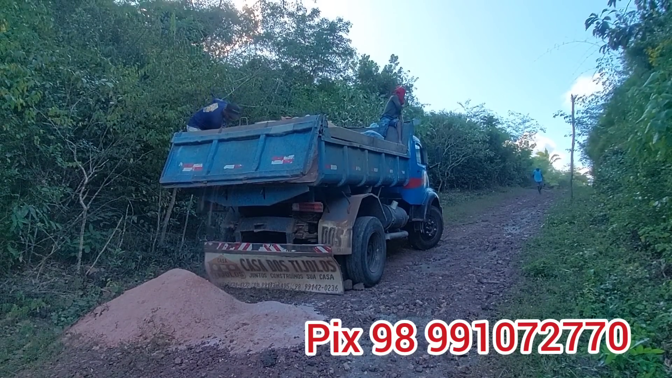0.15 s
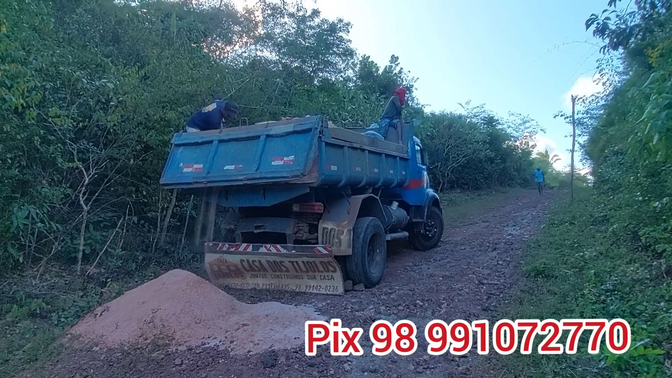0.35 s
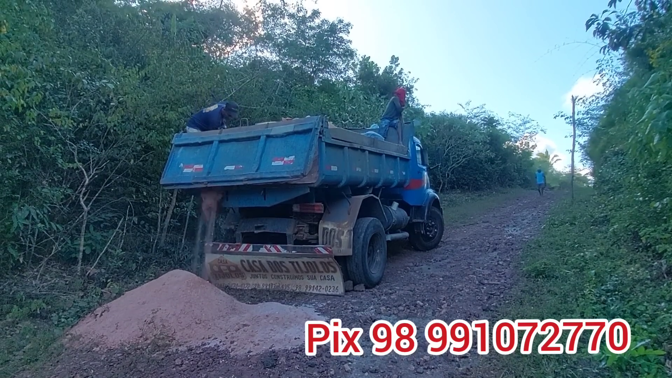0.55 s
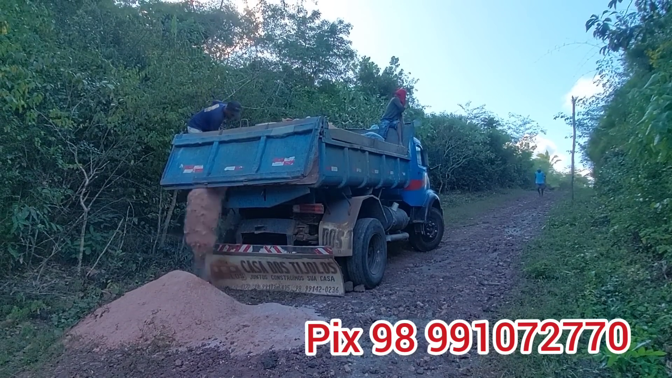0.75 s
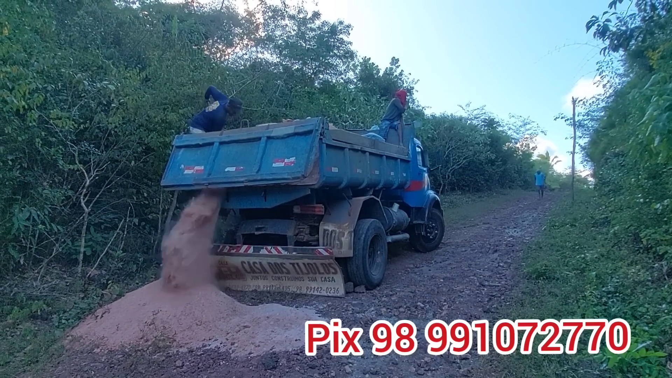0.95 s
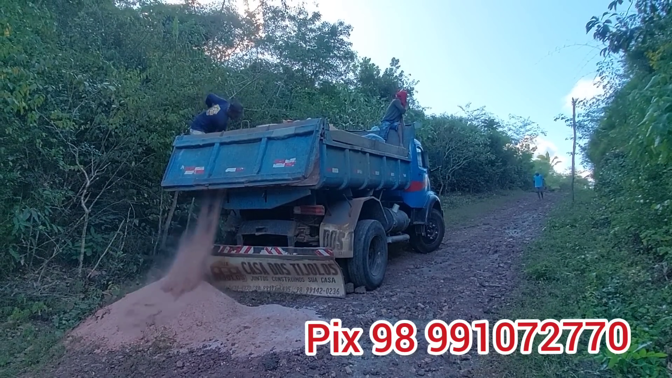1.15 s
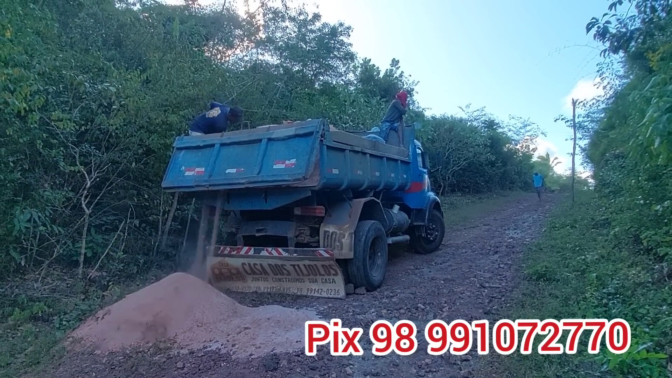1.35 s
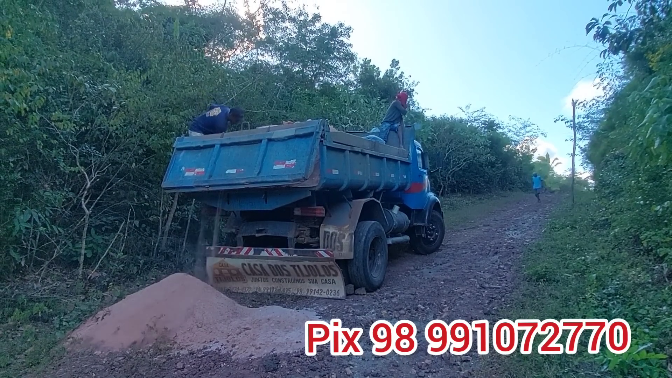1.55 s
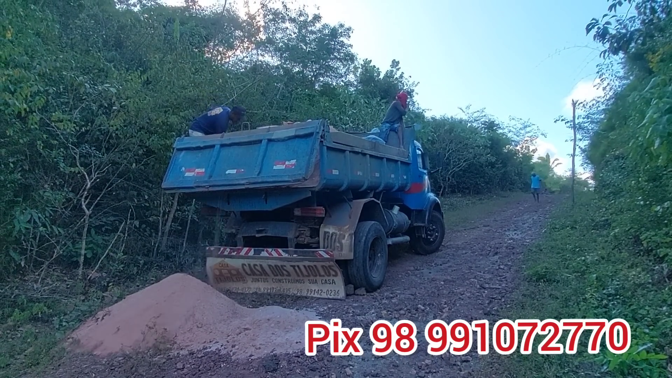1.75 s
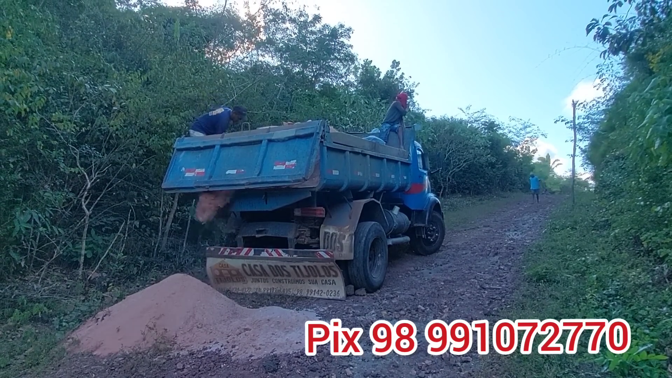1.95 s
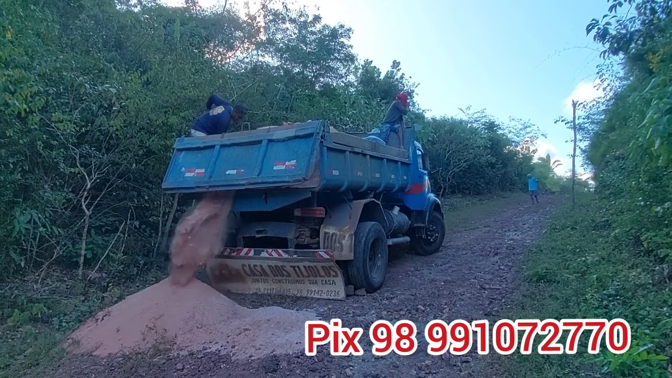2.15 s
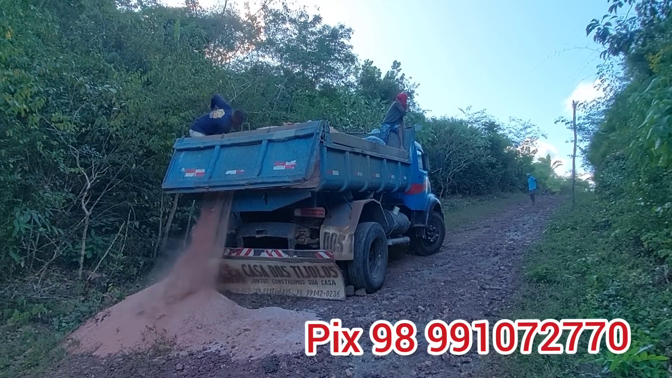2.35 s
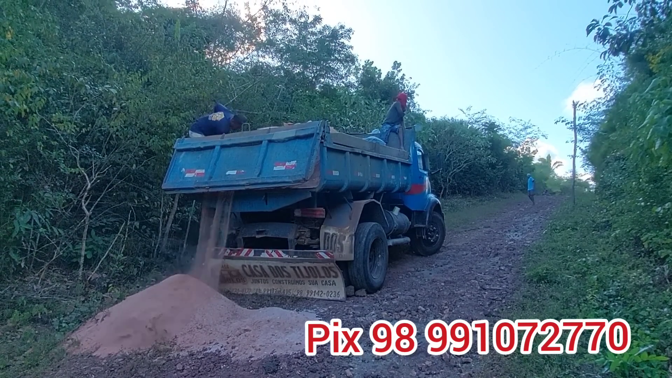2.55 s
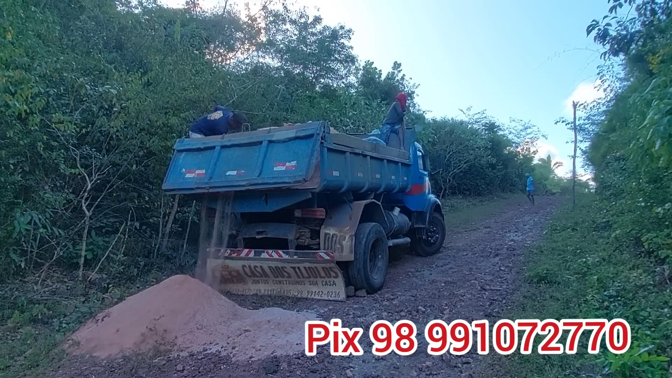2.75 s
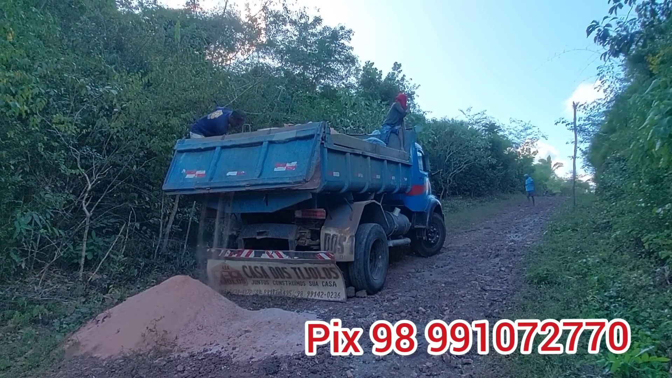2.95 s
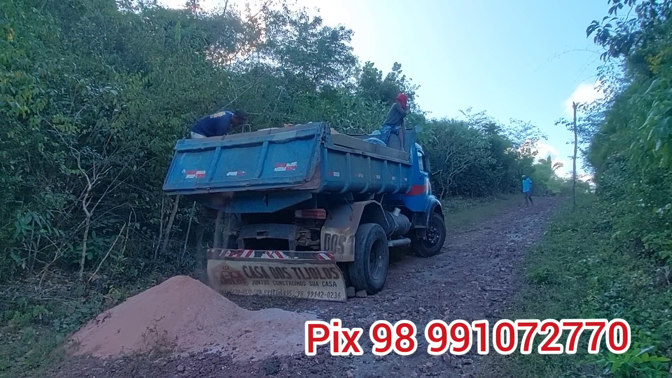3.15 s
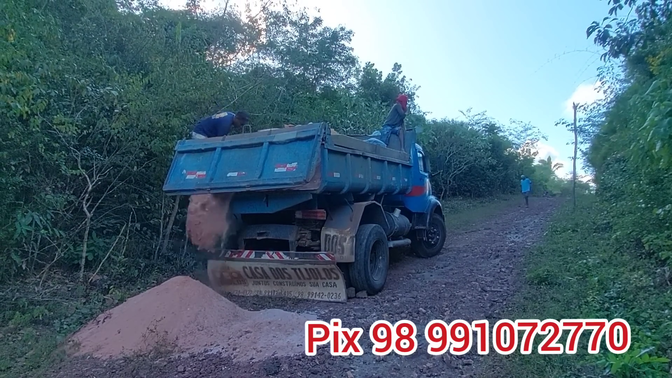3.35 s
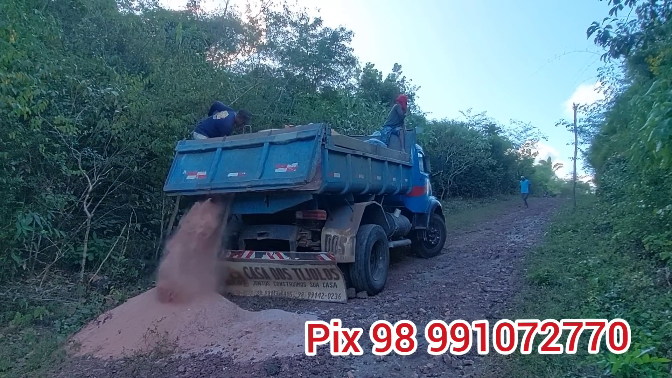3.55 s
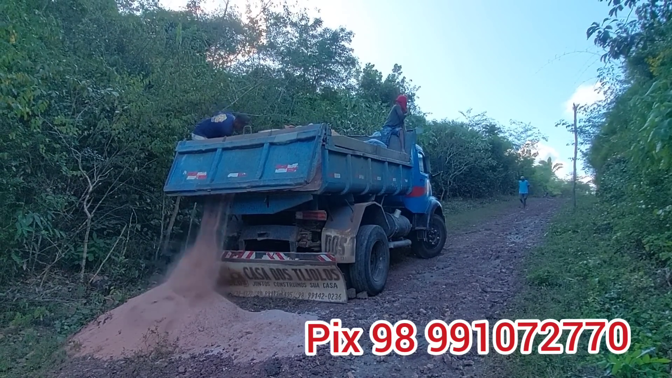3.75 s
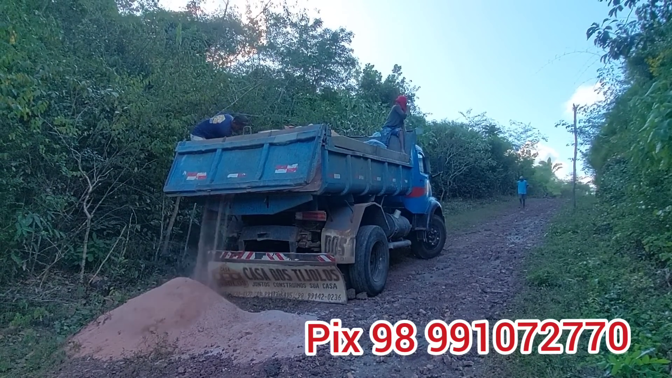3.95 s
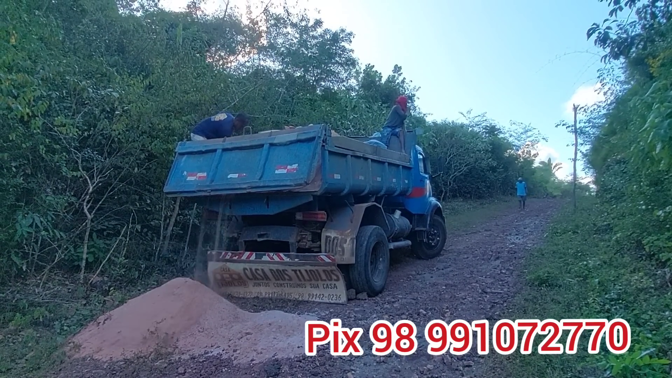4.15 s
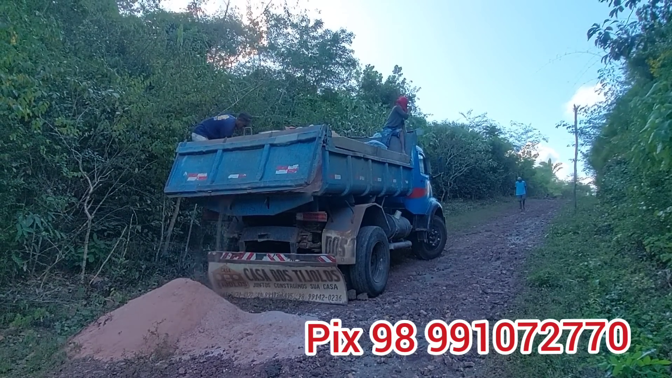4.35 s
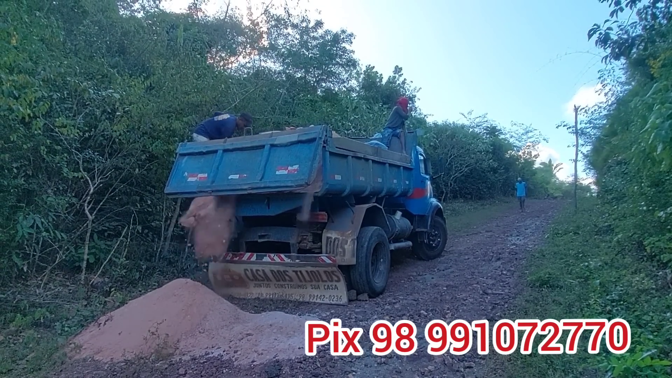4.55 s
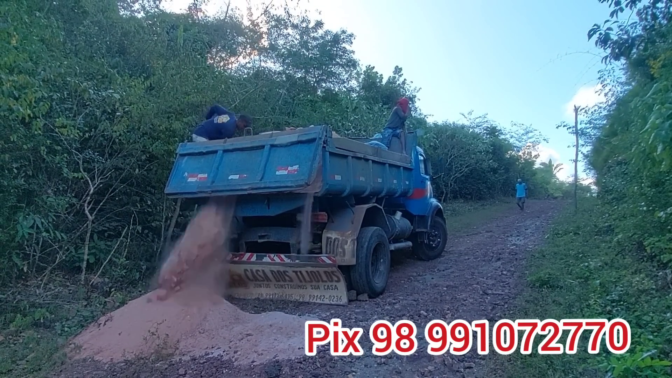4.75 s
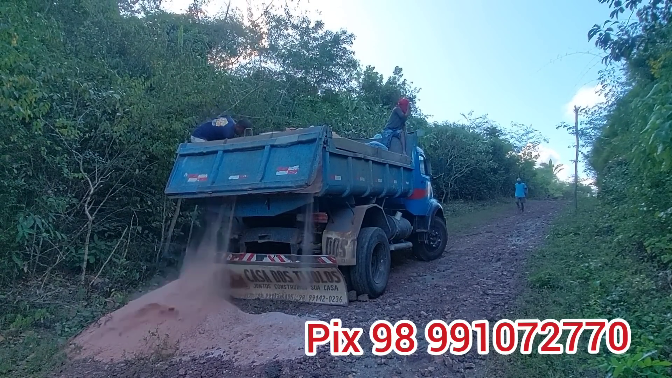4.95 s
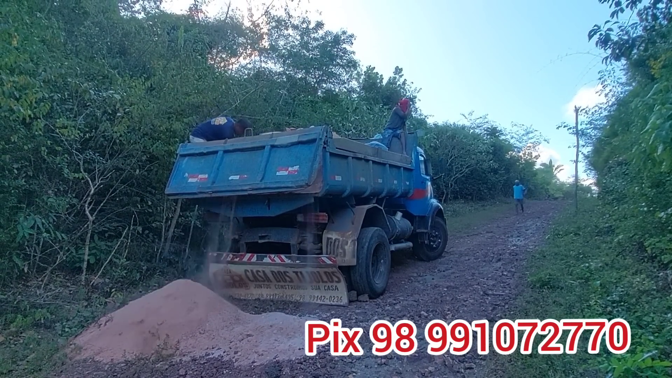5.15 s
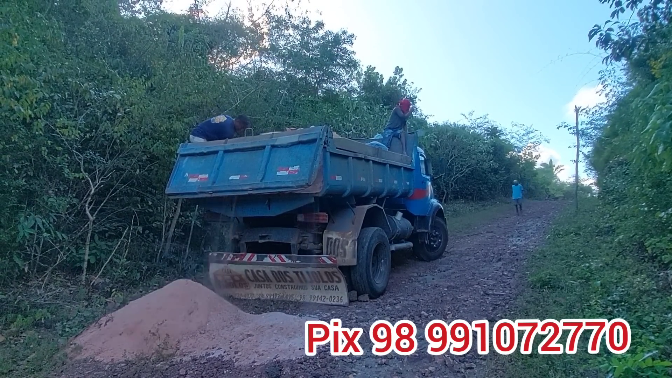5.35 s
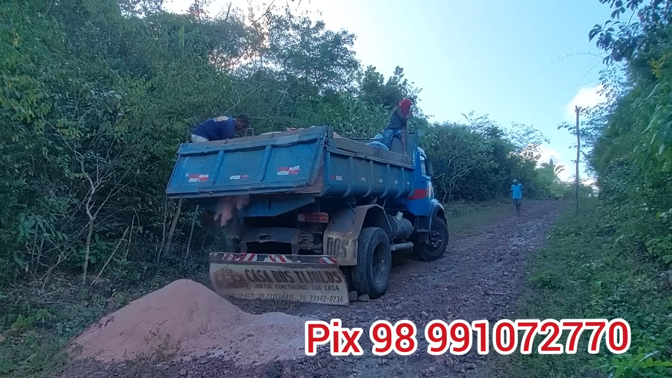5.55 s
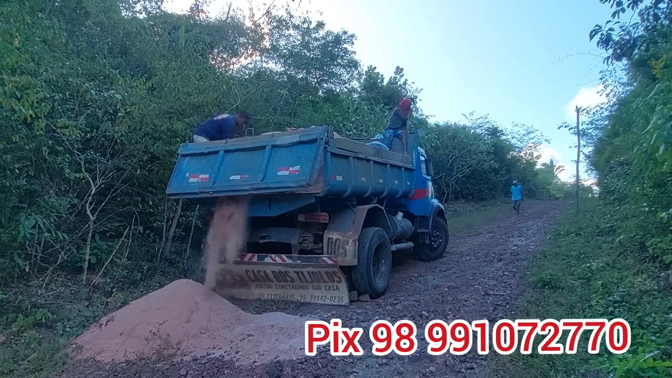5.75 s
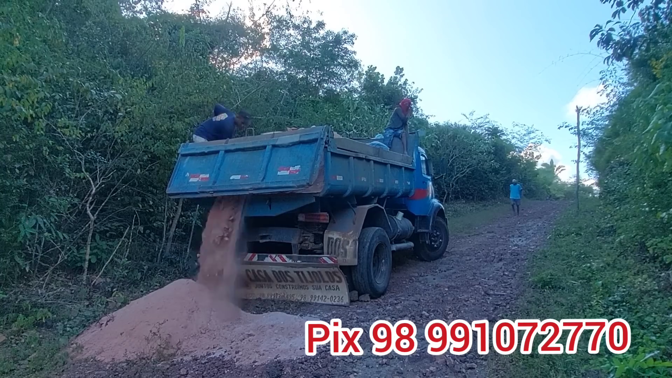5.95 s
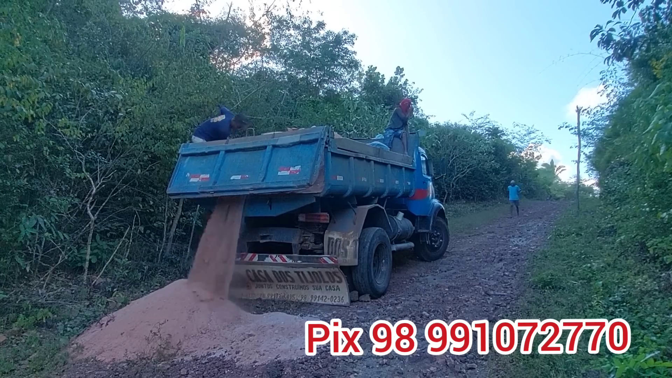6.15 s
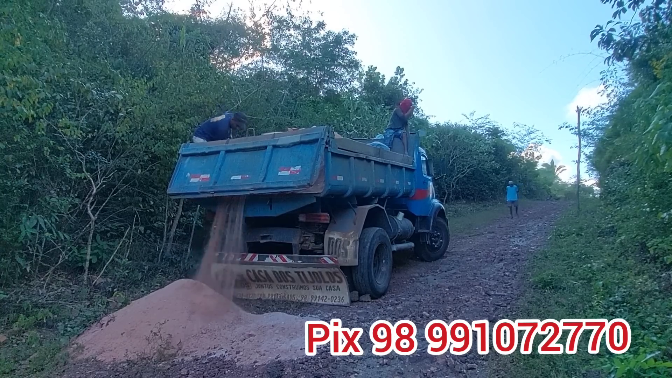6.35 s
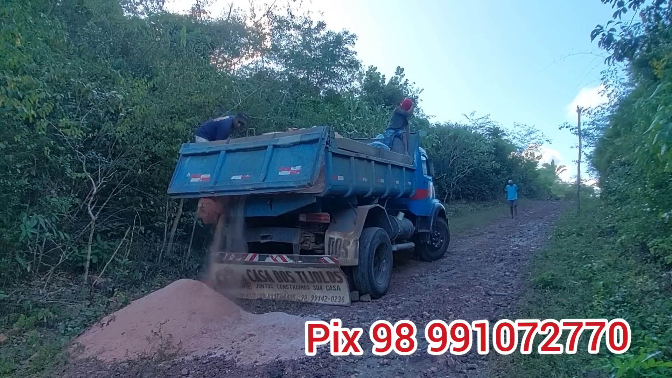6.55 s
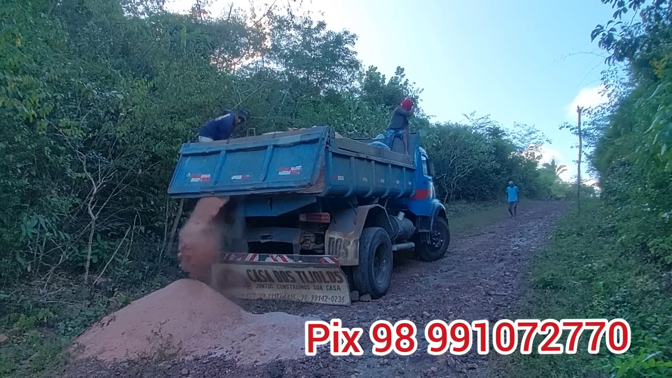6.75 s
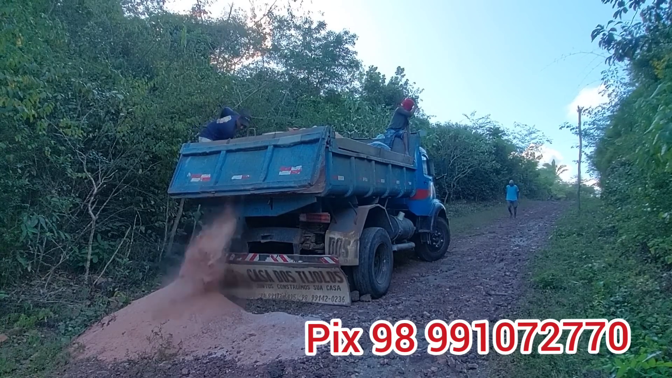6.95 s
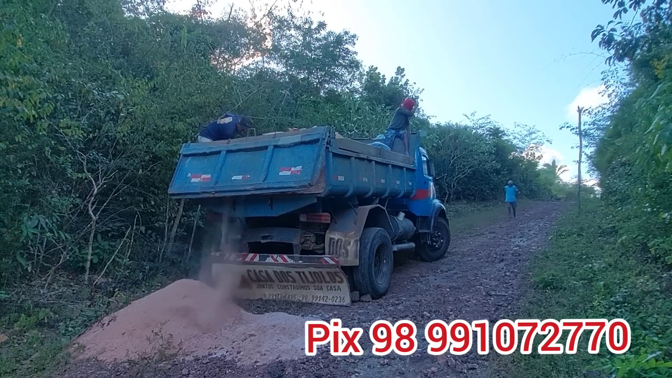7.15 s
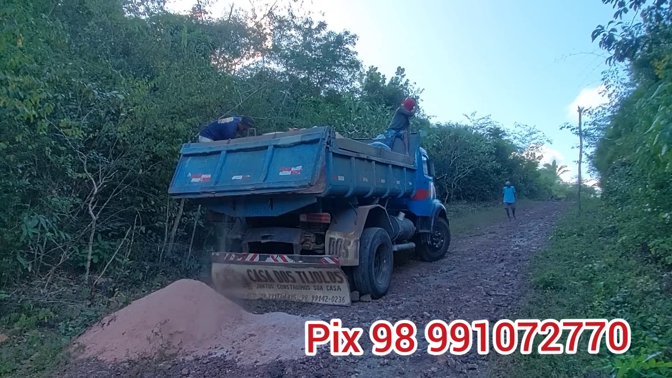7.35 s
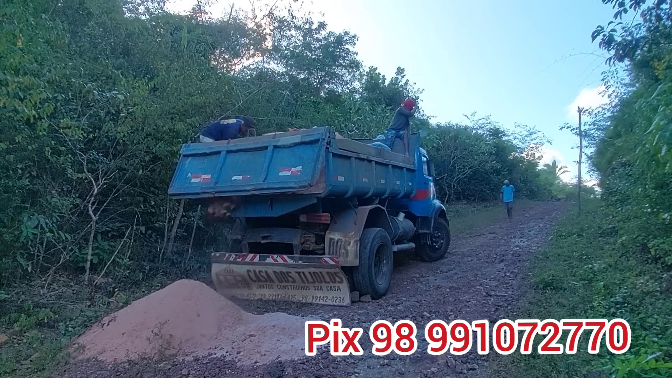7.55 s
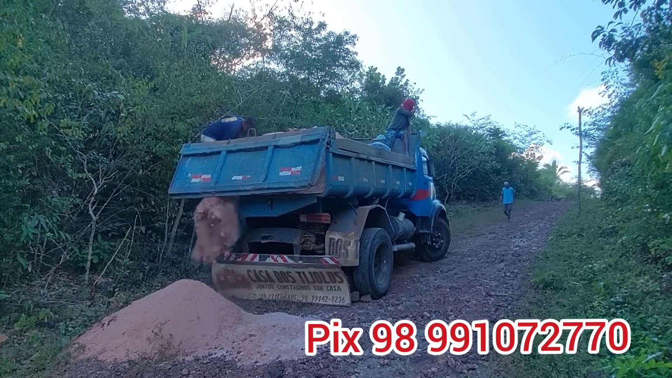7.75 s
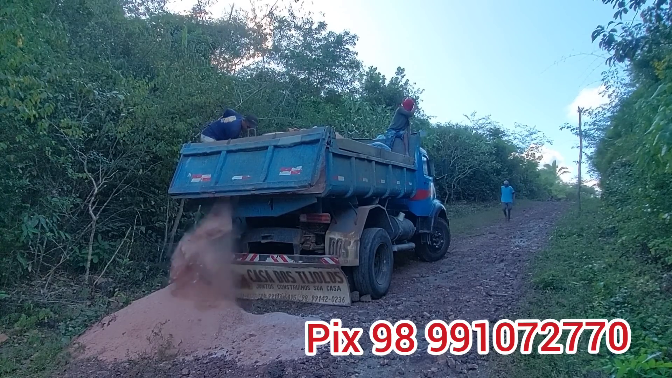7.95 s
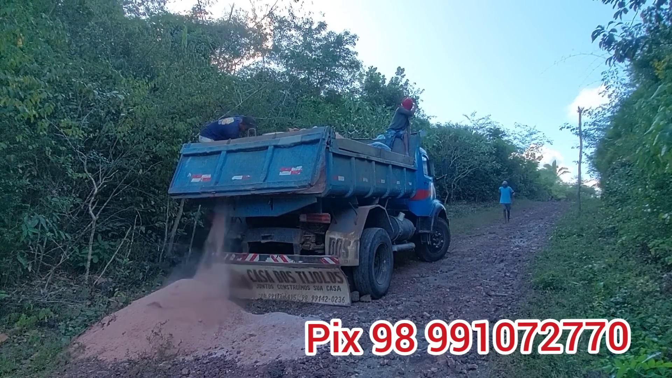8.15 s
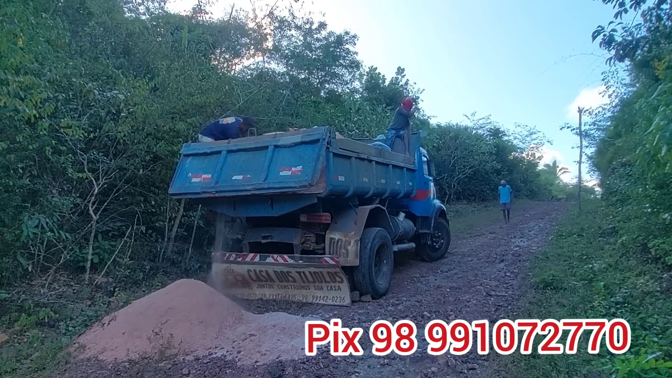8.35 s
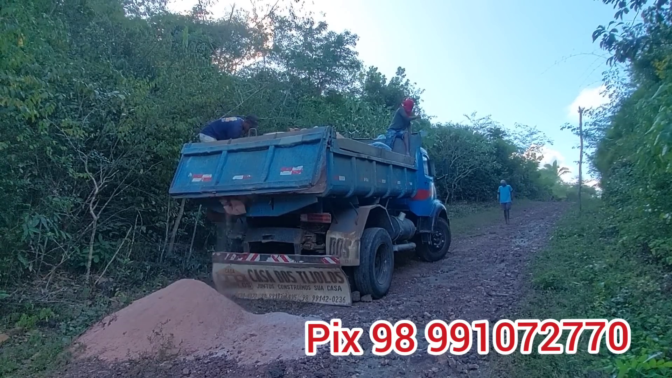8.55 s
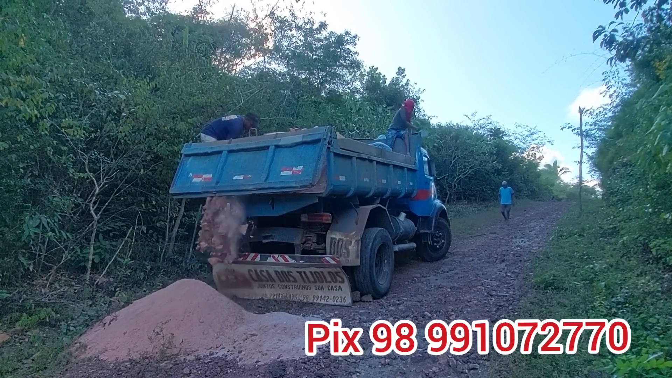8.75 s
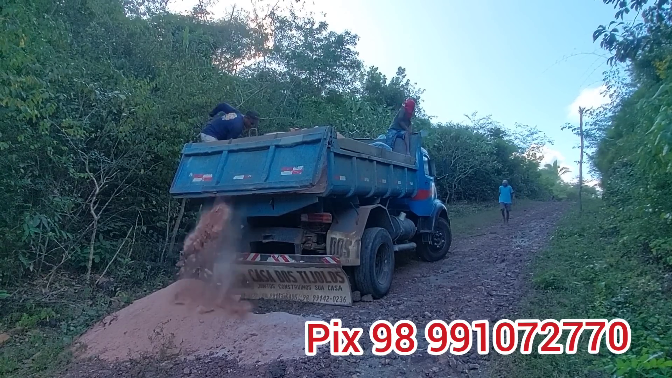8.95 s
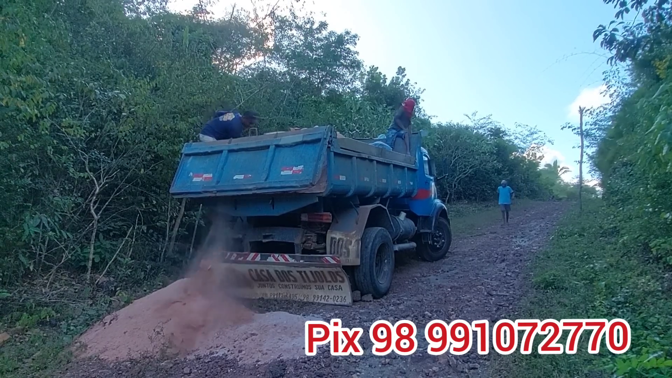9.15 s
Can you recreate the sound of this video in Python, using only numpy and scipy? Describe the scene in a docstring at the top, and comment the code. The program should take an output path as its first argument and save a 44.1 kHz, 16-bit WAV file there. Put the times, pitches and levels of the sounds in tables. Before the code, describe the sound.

Outdoors, a shovel scrapes damp sand off a hollow steel truck bed, load after load slumping, knocking and thudding softly onto a sand heap.

```python
"""Shovelling sand from a steel truck bed

Damp sand is shovelled off the steel bed of a tipper truck outdoors. The blade scrapes, jams and knocks:
grain impacts and damped modes ring in the steel. Loads slump as crowds of soft impacts, then thud onto
the heap as lumps, grit and damped low pushes. Loose grains hiss and tick, over low rumble and thin air."""
import sys
import numpy as np
from scipy import signal
from scipy.fft import rfft, irfft, next_fast_len
from scipy.io import wavfile
from scipy.ndimage import map_coordinates

SR = 44100
rng = np.random.default_rng(int(sys.argv[2]) if len(sys.argv) > 2 else 0)


def dump_mix(stems):
    """Bounce the given channels to the path in sys.argv[1] as a 16-bit WAV at rate SR."""
    frames = np.atleast_2d(stems).T  # one column per channel
    limited = np.clip(frames, -1, 1)  # hard clip at full scale
    pcm = np.round(limited * 32767).astype(np.int16)
    wavfile.write(sys.argv[1], SR, pcm)


N = 406602

# Event levels are relative; most layers are trimmed again where mixed,
# but knocks, drags and stray ticks have no trim of their own.
# Blade strokes through sand on steel: [t/s, length/s, level/dB, change over stroke/dB,
# spilled sand level/dB, floor drone against level/dB]
STROKES = [(0.84, 0.036, -47, -4, -94, -9), (3.377, 0.11, -40.5, -3.5, -53.5, -22),
           (4.551, 0.12, -43.5, -5.5, -55.5, -12), (6.685, 0.12, -52.5, 1, -57, -6),
           (7.78, 0.11, -57, 0, -55.5, -12), (8.744, 0.13, -58, 13, -55, -7.5)]
# Load dragging over the floor: [t/s, length/s, level/dB, change over drag/dB, spilled sand level/dB]
DRAGS = [(0.185, 0.1, -68, 5, -65), (0.687, 0.16, -64, 0, -56), (2.702, 0.34, -69, 7, -77),
         (5.857, 0.088, -66.5, -3, -64.5)]
# Gritty shoves of the blade along the bed: [t/s, level/dB, t60/s, floor drone against level/dB]
SHOVES = [(4.935, -41.5, 0.5, -12), (4.983, -33.5, 0.41, -22), (5.121, -45.5, 0.16, -22),
          (6.329, -34.5, 0.16, -12), (7.179, -33.5, 0.25, 0.5), (7.232, -34.5, 0.18, -24),
          (7.319, -35, 0.27, 2), (7.355, -41.5, 0.21, 3), (7.387, -36.5, 0.16, -10),
          (8.193, -31.5, 0.32, -14), (9.181, -38.5, 1, -5)]
# Resonances of the blade on the bed: [f/Hz, width/Hz, level/dB]
BLADE_MODES = [(1388, 91, 14.5), (2164, 36, 13), (2423, 170, 12), (3060, 40, -16), (4730, 160, 9.5),
               (5180, 190, 10), (5590, 220, 9.5)]
# Resonances of the tailgate: [f/Hz, width/Hz, level/dB]
TAILGATE_MODES = [(548, 42, 2.5), (704, 48, 2), (1140, 160, -1.5), (1311, 86, 4.5), (1687, 61, -8),
                  (1927, 110, 1)]
# Resonances of the floor plate under the blade: [f/Hz, width/Hz, level/dB]
FLOOR_MODES = [(552, 55, -2.1), (698, 58, -0.72)]
# Colour of sand rasping on steel: [f/Hz, level/dB]
RASP = [(150, -11), (420, -52), (570, -1), (1300, -3), (2400, 0.5), (5500, 1), (8000, -3), (14000, -15)]

DRAG_RISE_DB_PER_S, DRAG_FALL_DB_PER_S = 219, 187


def amp(db):
    """Decibels to gain."""
    return 10 ** (np.asarray(db) / 20)


def unit(x):
    """Scale to rms 1."""
    return x / np.sqrt(np.mean(x ** 2) + 1e-20)


def along(points, hz):
    """Read (Hz, value) points on a log frequency axis."""
    f, v = np.transpose(points)
    return np.interp(np.log(hz + 1), np.log(f + 1), v)


def noise():
    """Two unrelated white noises."""
    return rng.standard_normal((2, N))


def wobble(rate):
    """A smooth random curve, rate knots a second."""
    knots = rng.standard_normal(int(N * rate / SR) + 4)
    return map_coordinates(knots, [np.arange(N) * rate / SR])


def filtered(x, response):
    """x times a complex response of frequency."""
    m = next_fast_len(N + SR // 2)
    return irfft(rfft(x, m) * response(np.fft.rfftfreq(m, 1 / SR)), m)[..., :N]


def coloured(x, spectrum):
    """x through the given colour, at rms 1."""
    return unit(filtered(x, lambda hz: amp(along(spectrum, hz))))


def rung(x, modes):
    """x through parallel damped resonances of alternating sign, at rms 1."""
    def response(f):
        total = 0
        for k, (centre, width, db) in enumerate(modes):
            damping = 1j * f * width
            total = total + (-1) ** k * amp(db) * damping / (centre * centre - f * f + damping)
        return total
    return unit(filtered(x, response))


def grains(rate, spread_db):
    """Random impacts of scattered size, rate a second: two unrelated streams at rms 1."""
    hits = rng.random((2, N)) < rate / SR
    return unit(hits * rng.choice([-1, 1], (2, N)) * amp(spread_db * noise()))


def blow(s, hold, t60):
    """Gain of a contact that builds in 3.5 ms from s and starts to die away at hold after s."""
    t = np.maximum(np.arange(N) / SR - s, 0)
    return np.minimum(t / .0035, 1) * amp(-60 * np.minimum(np.maximum(t - hold, 0) / t60, 2))


def flow(s, length, change_db, rise, fall):
    """Gain of moving sand: rises until s, changes steadily for length, then falls; slopes in dB/s."""
    t = np.arange(N) / SR - s
    change = change_db * np.clip(t / max(length, 1 / SR), 0, 1)
    return amp(change + rise * np.minimum(t, 0) - fall * np.maximum(t - length, 0))


def thump(s, hz, t60):
    """One damped sine push from s, its pitch randomly scattered by about a quarter."""
    t = np.maximum(np.arange(N) / SR - s, 0)
    pitch_hz = hz * amp(2 * rng.standard_normal())
    return amp(-60 * np.minimum(t / t60, 2)) * np.sin(2 * np.pi * pitch_hz * t)


def air():
    """Faint outdoor background: shaped noise as low rumble, and a thin, steady band of high hiss."""
    # Background colour: [f/Hz, level/dB]
    air_colour = [(25, 1), (85, -3.5), (170, -5), (400, -11.5), (1100, -18.5), (2100, -10), (3100, -27.5),
                  (5000, -13), (15500, -20)]
    thin = coloured(noise(), [(7100, -50), (7600, -5), (7900, 0), (8100, -50)])
    return amp(-66.0) * coloured(noise(), air_colour) + amp(-65) * thin


def shove_force():
    """Drive of the blade along the floor: a short run-up as it gathers sand, then the jolt."""
    force = 0
    for s, db, t60, floor_db in SHOVES:
        run_up = amp(-11.5) * flow(s, 0, 0, rise=450, fall=450)
        force = force + amp(db) * (blow(s, hold=0.013, t60=t60) + run_up)
    return force


def loose_sand():
    """Amount of running sand: throws spray, then dribble; strokes, drags and shoves spill more."""
    # Loose sand after each throw: [t/s, spray level/dB, dribble level/dB, dribble length/s]
    throws = [(0.0, -51, -71, 0.16), (1.217, -48, -54, 0.74), (2.459, -51, -57, 0.24),
              (2.657, -52.5, -54, 0.4), (3.805, -42, -63, 1), (5.01, -67, -51.5, 0.39),
              (6.198, -61, -51.5, 0.068), (7.362, -45, -74, 0.22), (8.236, -45.5, -78, .2)]
    spray_rise, spray_fall = 212, 200  # dB/s
    sag, run_out = 8.5, 93  # dB/s: the dribble thins slowly, then runs out
    running = amp(-95)  # a little sand always sifts off the edge
    for s, spray_db, dribble_db, length in throws:
        running = running + amp(spray_db) * flow(s, 0, 0, spray_rise, spray_fall)
        running = running + amp(dribble_db) * flow(s, length, -sag * length, spray_rise, run_out)
    # sand runs ahead of the blade and settles behind it
    for s, length, db, change_db, spill_db, floor_db in STROKES:
        running = running + amp(spill_db) * flow(s, length, 0, rise=103, fall=196)
    for s, length, db, change_db, spill_db in DRAGS:
        running = running + amp(spill_db) * flow(s, length, 0, DRAG_RISE_DB_PER_S, DRAG_FALL_DB_PER_S)
    return running + amp(-6.5) * shove_force()


def trickle():
    """Fine sand hisses down as dense impacts in uneven wisps, with small stones ticking in it."""
    # Colour of falling grains: [f/Hz, level/dB]
    spray_colour = [(150, -21), (350, -1), (1100, -6.5), (2200, 5.5), (3200, -4), (5000, 5), (12000, 4)]
    # Stray stones ticking: [t/s, level/dB]
    stray_ticks = [(1.748, -55), (2.987, -37), (3.022, -38), (4.7617, -45), (5.266, -44), (5.288, -38.5)]
    fine = grains(rate=18000, spread_db=6) * amp(1.76 * wobble(60) + wobble(19))
    stones = grains(rate=130, spread_db=13.0)
    hiss = coloured(fine + amp(-20) * stones, spray_colour)
    ticks = sum(amp(db) * blow(s, hold=0.0014, t60=0.016) for s, db in stray_ticks)
    return amp(3.0) * loose_sand() * hiss + ticks * coloured(noise(), RASP)


def drags():
    """Sand pushed over the floor makes the bed murmur: grain impacts excite one broad resonance."""
    push = 0
    for s, length, db, change_db, spill_db in DRAGS:
        push = push + amp(db) * flow(s, length, change_db, DRAG_RISE_DB_PER_S, DRAG_FALL_DB_PER_S)
    return push * rung(grains(rate=1100, spread_db=0.5), [(390, 200, 0)])


def scrapes():
    """Fine and coarse grains catch and slip under the blade; steel modes slide in pitch as it tilts."""
    # Blade biting in or jolting over the floor: [t/s, level/dB, t60/s]
    bites = [(2.401, -44.5, 0.54), (2.597, -42, 0.12), (2.9847, -40, 0.32), (3.381, -33, 0.12),
             (4.549, -30.5, 0.13), (6.668, -34.5, 0.4), (7.7814, -48.5, 0.27), (7.9117, -34.5, 0.13),
             (8.788, -34.5, 0.12)]
    slide = drone = 0
    for s, length, db, change_db, spill_db, floor_db in STROKES:
        # the blade takes up the load, and comes free
        stroke = amp(db) * flow(s, length, change_db, rise=410, fall=480)
        slide, drone = slide + stroke, drone + amp(floor_db) * stroke
    bite = sum(amp(db) * blow(s, hold=0.0029, t60=t60) for s, db, t60 in bites)
    force = amp(2.5) * slide + amp(-7.0) * bite
    slips = grains(rate=9000, spread_db=0) + amp(-6) * grains(rate=540, spread_db=4.5)
    slips = slips * amp(2.2 * wobble(110))
    shift = amp(0.64)  # frequency ratio either way, about 7.6 %
    low = rung(slips, [(hz / shift, width, db) for hz, width, db in BLADE_MODES])
    high = rung(slips, [(hz * shift, width, db) for hz, width, db in BLADE_MODES])
    tilt = np.pi / 4 * (1 + np.tanh(2 * wobble(16)))  # crossfade angle between low and high
    ring = unit(np.cos(tilt) * low + np.sin(tilt) * high)
    scrape = amp(-.5) * coloured(slips, RASP) + amp(-7.0) * ring
    return force * scrape + drone * rung(slips, FLOOR_MODES)


def slumps():
    """Loads hit the steel as crowds of soft lumps; grit starts to fade first and the tailgate clanks."""
    # Loads slumping on steel: [t/s, level/dB, grit against level/dB, t60/s]
    loads = [(0.938, -34, -10.5, 0.29), (0.963, -33.5, -12, 0.1), (3.7, -27.5, -18, 0.38),
             (3.942, -46.5, -15, 0.16), (4.811, -36, -12, 0.38), (5.303, -36, -14, 0.2),
             (5.93, -47.5, -21, 0.23), (6.006, -40.5, -4.5, 0.18), (6.041, -36, -38, 0.16),
             (6.908, -34.5, -23, 0.44), (6.999, -34.5, -19, 0.22), (7.978, -56, -24, 0.051),
             (8.703, -35.5, -13, 0.58), (8.943, -44.5, -23, 0.076)]
    # Colour of soft lumps on steel: [f/Hz, level/dB]
    steel_colour = [(50, -13), (200, -1), (650, 0), (2400, -7), (4500, -18.5), (9000, -54)]
    body = grit = 0
    for s, db, grit_db, t60 in loads:
        body = body + amp(db) * blow(s, hold=0.02, t60=t60)
        grit = grit + amp(db + grit_db) * blow(s, hold=0.0066, t60=1.07 * t60)
    lumps = coloured(grains(rate=1500, spread_db=1.0), steel_colour)
    sand = coloured(grains(rate=7500, spread_db=3), RASP)
    clank = rung(noise(), TAILGATE_MODES)
    return body * (amp(-7.5) * lumps + amp(-12.5) * clank) + grit * sand


def heap():
    """Lumps drum on the heap with crunching grit; clods add a puff, a push and a deep ground thud."""
    # Masses of sand landing: [t/s, length/s, level/dB, change over fall/dB, grit against level/dB]
    falls = [(0.952, 0.14, -40, -7, -11.5), (1.149, 0.091, -44.5, 9.5, -9), (2.274, 0.18, -54.5, 18.5, -23),
             (2.574, 0.18, -45, -19, -11), (3.591, 0.23, -50.5, 16.5, -9), (3.87, 0.16, -53.5, -3, -19),
             (4.836, 0.18, -41.5, 6, -8.5), (6.032, 0.28, -44, -1, -6), (6.947, 0.51, -41.5, -16, -21),
             (7.974, 0.27, -57.5, 15.5, -15), (8.741, 0.16, -47, -12, -22), (8.94, 0.4, -50, 6, -36)]
    # Single clods landing: [t/s, level/dB]
    clods = [(0.96, -30.5), (1.005, -29), (2.393, -39), (2.455, -47), (3.777, -30), (3.819, -21.5),
             (4.991, -26), (6.155, -31), (7.979, -35.5), (8.042, -40.5), (8.175, -32), (8.955, -27),
             (8.993, -26)]
    # Colours of lumps on the heap, crunching grit and a clod's puff: [f/Hz, level/dB]
    heap_colour = [(22, -38), (55, 5), (100, -1), (185, 2), (310, -5.5), (650, -17), (1200, -23.5),
                   (7000, -33.5)]
    crunch_colour = [(200, -8), (600, 2.5), (1800, -5.5), (5000, -11.5), (12000, -34)]
    clod_colour = [(30, -7), (70, 10), (250, -1.5), (650, 0), (1500, -17.5), (5000, -34)]
    # Hollow note of sand drumming on the heap: [f/Hz, width/Hz, level/dB]
    boom_modes = [(189, 54, 0)]
    landing = gritty = 0
    for s, length, db, change_db, grit_db in falls:
        fall = amp(db) * flow(s, length, change_db, rise=370, fall=202)
        landing, gritty = landing + fall, gritty + amp(grit_db) * fall
    lumps = coloured(grains(rate=520, spread_db=1.5), heap_colour)
    boom = rung(grains(rate=520, spread_db=0), boom_modes)
    crunch = coloured(grains(rate=2500, spread_db=4.5), crunch_colour)
    patter = landing * (amp(-1.5) * lumps + amp(-8.5) * boom) + gritty * crunch
    weight = push = 0
    for s, db in clods:
        weight = weight + amp(db) * blow(s, hold=0.0033, t60=0.066)
        ground_thud = amp(-13) * thump(s, hz=54, t60=0.28)
        push = push + amp(db) * (thump(s, hz=185, t60=0.018) + ground_thud)
    puff = weight * coloured(grains(rate=3000, spread_db=3.0), clod_colour)
    # the pushes feed the first stream only
    return amp(-1.5) * patter + amp(-10.0) * puff + np.array([push, np.zeros(N)])


def knocks():
    """A knock rings blade and tailgate modes together; the struck spot decides which ones speak."""
    # Blade edge knocking on steel: [t/s, level/dB, centre of the ringing f/Hz]
    edge_hits = [(0.976, -40.5, 720), (2.424, -43.5, 1620), (3.703, -29, 1270), (3.943, -46.5, 1090),
                 (6.046, -43, 1240), (6.909, -34.5, 1240), (8.193, -33, 2400), (8.705, -36, 1910)]
    span_octaves = 0.21  # how far the ringing spreads around its centre
    out, t = np.zeros((2, N + SR)), np.arange(SR // 3) / SR
    modes_hz = np.array([hz for hz, width, db in BLADE_MODES + TAILGATE_MODES])[:, None]
    fade = blow(0, hold=0.004, t60=0.094)[:len(t)]
    for s, db, pitch_hz in edge_hits:
        octaves_off = np.log2(modes_hz / pitch_hz)
        share = np.exp(-.5 * (octaves_off / span_octaves) ** 2)
        share = share * amp(2 * rng.standard_normal(modes_hz.shape))
        detuned = modes_hz * (1 + .012 * rng.standard_normal(modes_hz.shape))
        cycles = detuned * t + rng.random((2, len(modes_hz), 1))
        ring = (share * np.sin(2 * np.pi * cycles)).sum(1)
        out[:, round(s * SR):][:, :len(t)] += amp(db) * fade * ring * np.sqrt(2) / np.linalg.norm(share)
    return out[:, :N]


def shoves():
    """The blade drives along the floor: sand crunches in uneven clumps while the floor plate drones."""
    # Colour of crunching sand: [f/Hz, level/dB]
    grit_colour = [(60, -3), (220, 3), (2400, -1), (4000, -3.5), (6000, -12)]
    drone = sum(amp(db + floor_db) * blow(s, hold=0.0068, t60=t60) for s, db, t60, floor_db in SHOVES)
    crunch = grains(rate=7000, spread_db=0) + amp(-3.5) * grains(rate=260, spread_db=3.5)
    crunch = crunch * amp(1.54 * wobble(90))
    grind = amp(-4.0) * coloured(crunch, grit_colour) + amp(-15) * rung(crunch, BLADE_MODES)
    return shove_force() * grind + amp(-7.5) * drone * rung(crunch, FLOOR_MODES)


def bed(x, ring_db, t60):
    """Sound bounces between steel sides: random tails, renewed every 0.2 s and crossfaded, shift the ring."""
    hop = SR // 5
    t = np.arange(hop) / SR
    padded, ring = np.pad(x, ((0, 0), (hop, 2 * hop))), np.zeros((2, N + 4 * hop))
    for i in range(0, N + hop, hop):
        tail = rng.standard_normal((2, hop)) * amp(-60 * t / t60)
        piece = padded[:, i:i + 2 * hop] * np.hanning(2 * hop)
        ring[:, i:i + 3 * hop - 1] += signal.fftconvolve(piece, tail / np.linalg.norm(tail[0]), axes=1)
    above_bass = filtered(ring[:, hop:hop + N], lambda hz: hz / np.hypot(hz, 600))
    return (x + amp(ring_db) * above_bass) / np.hypot(1, amp(ring_db))


def trees(x, t60):
    """The wall of foliage answers with a fading noise tail, dulled above 3.5 kHz."""
    t = np.arange(SR // 2) / SR
    tail = rng.standard_normal((2, len(t))) * amp(-60 * t / t60)
    wet = signal.fftconvolve(x, tail / np.linalg.norm(tail[0]), axes=1)[:, :N]
    return filtered(wet, lambda hz: 1 / np.hypot(1, hz / 3500))


def place(pair, lag_ms):
    """Two streams become mid and side: shared bass, scattered treble, the left slightly sooner."""
    # Left-right likeness: [f/Hz, correlation]
    likeness = [(200, .98), (650, .94), (1100, .8), (2100, .3), (6000, .25), (10000, .12)]
    # Left minus right: [f/Hz, level/dB]
    lean = [(450, 0.5), (1000, -3), (1300, -4.5), (2200, -8.5), (3600, -0.5), (7500, 0), (11500, -10),
            (15500, -5.5)]
    half = np.array([[.5], [-.5]])  # left and right each take half the difference

    def spread(hz):
        turn = np.arccos(along(likeness, hz)) / 2
        return np.array([np.cos(turn), np.sin(turn)])

    def balance(hz):
        return amp(half * along(lean, hz)) * np.exp(2j * np.pi * hz * half * lag_ms / 1000)

    mid, side = filtered(pair, spread)
    return filtered(np.array([mid + side, mid - side]), balance)


def scene():
    """Blade and load sound in the steel bed; the sand falls in the open, before the trees."""
    steel = bed(scrapes() + slumps() + shoves(), ring_db=-3, t60=.07)
    truck = amp(1.5) * (steel + trickle()) + knocks() + drags()
    ground = heap()
    echo = amp(-10.5) * trees(truck + ground, t60=0.28)
    return place(truck + echo, lag_ms=0.23) + place(ground + air(), lag_ms=0.12)


def record(dry):
    """The phone's microphone ports colour the sound, and nothing passes above the band limit."""
    # Microphone port response: [f/Hz, level/dB]
    ports = [(22, -13), (45, -0.5), (320, -0.5), (450, -6.5), (570, -0.5), (720, 1.5), (860, -4.5),
             (1200, -1), (6000, -3), (8500, -14), (11800, 0.5), (15500, -2.5)]
    top_hz = 15900
    return filtered(dry, lambda hz: amp(along(ports, hz)) * (hz < top_hz))


dry = scene()
out = record(dry)
dump_mix(out)
```